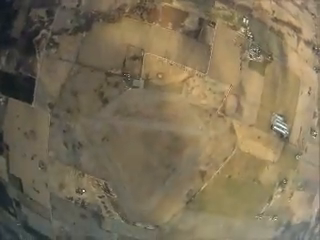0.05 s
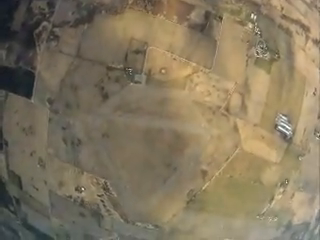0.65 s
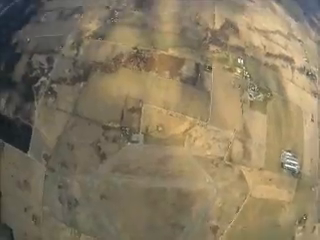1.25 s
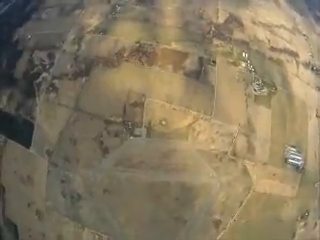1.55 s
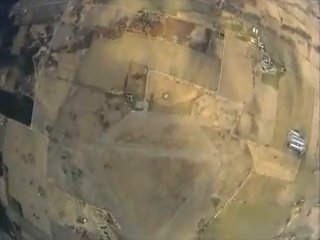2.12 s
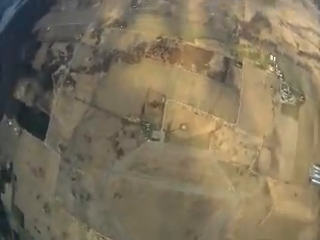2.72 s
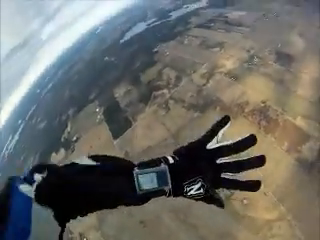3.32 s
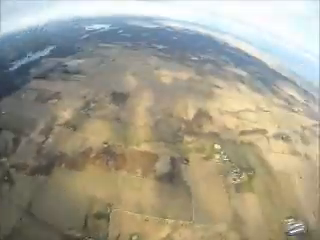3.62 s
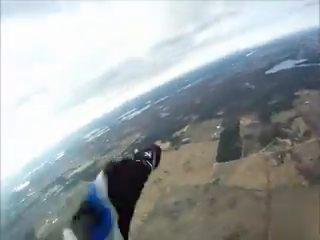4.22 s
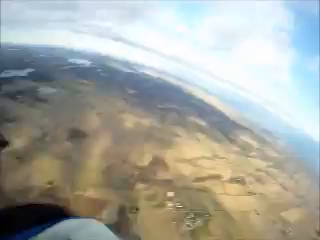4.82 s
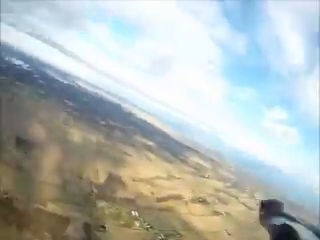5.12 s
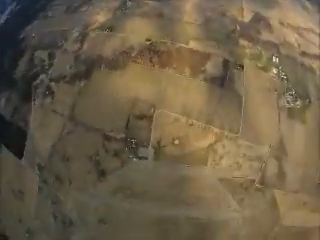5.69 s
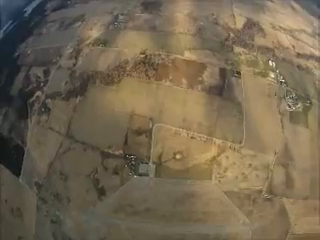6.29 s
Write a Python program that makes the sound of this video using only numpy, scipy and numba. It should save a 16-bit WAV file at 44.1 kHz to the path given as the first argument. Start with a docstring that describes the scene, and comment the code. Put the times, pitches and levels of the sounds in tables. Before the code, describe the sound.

Air tears over a helmet microphone high in the open sky, making a close, continuous roar with a slight howl and a thin hiss over rumbling thumps. As the falling skydiver turns, the wind grows choppy, with abrupt gusts and short dips. It becomes deeper and more muffled for a moment, fluttering over heavy buffeting, before brighter blasts of air come back.

```python
"""Rushing air tears past a helmet camera in freefall. Big swirls of air thump on its case, smaller ones
roar, howl and rasp, the finest hiss in spurts, and an edge of the case half whistles. As the body turns,
gusts slap on and off the microphone. When the head turns it into shelter, the rush breaks up into ragged
flutter over the thumping. A limiter (a fast automatic volume control) holds down the loud peaks."""
import sys
import numpy as np
from scipy import signal
from scipy.fft import rfft, irfft, next_fast_len
from scipy.io import wavfile
from scipy.ndimage import uniform_filter1d
from numba import njit

SR = 44100
rng = np.random.default_rng(int(sys.argv[2]) if len(sys.argv) > 2 else 0)


def master_out(mix):
    """Clip the mix to full scale and print it as 16-bit PCM to the path in sys.argv[1]."""
    frames = np.transpose(np.atleast_2d(mix))
    ceiling = np.clip(frames, -1, 1)
    pcm = np.round(ceiling * 32767).astype(np.int16)
    wavfile.write(sys.argv[1], SR, pcm)


N = 280035
TIME = np.arange(N) / SR


def gain(db):
    """Turn decibels into a number to multiply a sound by."""
    return 10 ** (np.asarray(db) / 20)


def steady(x, span_s):
    """Even out slow changes of level and keep the quick ones."""
    return x / np.sqrt(uniform_filter1d(x ** 2, size=int(span_s * SR)))


def curve(table):
    """Join (time_s, value) points with straight lines."""
    return np.interp(TIME, *np.transpose(table))


def colour(x, points):
    """Make some pitches louder and others softer, following (pitch_hz, level_db) points."""
    hz, db = np.transpose(points)
    size = next_fast_len(N)
    bins_hz = np.maximum(np.arange(size // 2 + 1) * SR / size, 1)
    level_db = np.interp(np.log(bins_hz), np.log(hz), db)
    return irfft(rfft(x, size) * gain(level_db), size)[:N]


def flutter(rate_hz):
    """A random wobble up to about the given rate, with a typical size of 1."""
    x = signal.sosfilt(signal.butter(2, rate_hz, fs=SR, output="sos"), rng.standard_normal(N))
    return x / x.std()


@njit
def resonate(x, hz, damping):
    """Ring at a moving pitch: output 0 keeps the sound below it, output 1 the sound around it."""
    out, band_state, low_state = np.empty((2, len(x))), 0., 0.
    for i in range(len(x)):
        step = np.tan(np.pi * hz[i] / SR)
        band = (band_state + step * (x[i] - low_state)) / (1 + step * (step + damping))
        out[0, i], out[1, i] = low_state + step * band, damping * band
        band_state, low_state = 2 * band - band_state, low_state + 2 * step * band
    return out


# Tone of the slow pressure swings from big swirls: pitch_hz, level_db
THUMP_TONE = [(12, 4.5), (25, -13), (42, -0.5), (70, 2), (115, 3.5), (160, 1.5), (215, -6.5), (280, -6),
              (400, -14.5), (900, -56)]
# How the thumping swells and fades: time_s, level_db
THUMP_LEVELS = [(0.0, -21.0), (0.23, -28.5), (1.18, -25.5), (1.29, -20), (1.8, -19), (2.49, -28.5),
                (4.17, -16), (4.27, -23.5), (4.66, -17.5), (5.34, -17.5), (5.42, -20.5), (5.88, -20.0),
                (6.12, -17), (6.34, -28)]


def thumping(shelter):
    """Big swirls of air thump on the case and grow deeper as it turns away from the wind."""
    swings = colour(rng.standard_normal(N), THUMP_TONE)
    biggest_swirls = colour(swings, [(85, 12), (170, 5.0)])
    depth = gain(-1.5 + 8.5 * np.minimum(shelter, 0.43))
    level_db = curve(THUMP_LEVELS) + 2 + 0.7 * shelter
    return gain(level_db) * steady(swings + (depth - 1) * biggest_swirls, span_s=0.09)


# The case's own note: pitch_hz, level_db
CASE_NOTE = [(200, -35), (450, -5), (590, -5), (750, -14.5), (1200, -11), (3000, -60)]
# Hollow tone that the case gives the roar: pitch_hz, level_db
HOLLOW_TONE = [(120, 5.5), (200, 5.5), (290, 0.5), (370, -0.5), (450, 1), (580, 1), (720, 0), (900, -4),
               (1400, -4)]


def roar(swirl_hz, shelter):
    """Swirls peel off around one wandering pitch and make the case ring."""
    hz = swirl_hz * np.exp(0.15 * flutter(20.7))
    swirls = resonate(rng.standard_normal(N), hz, damping=0.84)[1]
    swirls = resonate(swirls, hz * 1.85, damping=1.0)[0]  # smaller, higher swirls are much weaker
    swirls = steady(swirls, span_s=0.17)
    ring = steady(colour(rng.standard_normal(N), CASE_NOTE), span_s=0.11)
    return steady(colour(swirls + gain(-9 - 5 * shelter) * ring, HOLLOW_TONE), span_s=0.04)


def howl(swirl_hz):
    """In fast, smooth wind the swirls peel off almost regularly and hoot around one hollow note."""
    hz = swirl_hz * 1.038 * np.exp(0.078 * flutter(10.7))
    hoot = resonate(rng.standard_normal(N), hz, damping=0.24)[1]
    return steady(resonate(hoot, hz, damping=0.48)[1], span_s=0.103)


# Tone of the rasp, plus a thin fizz at the very top: pitch_hz, level_db
RASP_TONE = [(250, -7.5), (550, 7), (780, 3.5), (1050, -5.5), (1600, -10), (2800, -13), (4500, -37),
             (8000, -38), (10600, -23.5), (11500, -10)]


def rasp(swirls, shelter):
    """Strong swirls tear where their pressure changes fastest, so the rasp flutters in step with them."""
    pressure = colour(swirls, [(350, 7), (900, -23)])
    steepness = abs(steady(np.gradient(pressure), span_s=0.059))
    strength = np.minimum(steepness, 2.5) ** (0.34 + 0.87 * shelter)
    return steady(colour(rng.standard_normal(N) * strength, RASP_TONE), span_s=0.045)


# Tone that the case gives the hiss: pitch_hz, level_db
HISS_TONE = [(500, -9), (1000, -4), (1500, -4.5), (1850, -5), (2170, -1.5), (2800, -1), (3400, -7),
             (3700, -6), (4100, -11), (5200, -17.5), (7000, -19.5), (9500, -10), (10600, -20),
             (11500, -41.5)]


def hiss(shelter):
    """The finest swirls hiss in spurts, which get more ragged in shelter."""
    spurts_db = (0.5 + 5 * shelter) * np.clip(flutter(290), -3, 3)
    return steady(colour(rng.standard_normal(N) * gain(spurts_db), HISS_TONE), span_s=0.27)


def whistle(pitch_hz=2222.0):
    """An edge of the case half whistles when the wind meets it head on."""
    hz = pitch_hz * np.exp(0.038 * flutter(15))
    return steady(resonate(rng.standard_normal(N), hz, damping=0.21)[1], span_s=0.039)


# Wind slapping onto the microphone (+) or tearing off it (-) as the body turns; the rows at 2.974 s and 3.552 s
# are brief rushes of hiss as an arm sweeps past: start_s, length_s, roar_change_db, hiss_change_db,
# pitch_change_octaves
GUST_CHANGES = [(2.974, 0.067, -1, 3, 0.19), (3.058, 0.054, -1.5, 0.5, 0.46),
                (3.552, 0.056, -2.5, 2.5, 0.0), (3.903, 0.12, -4, -6, 0.055), (4.006, 0.038, 7, 2.5, 0.1),
                (4.104, 0.047, -7, -5, 0.15), (4.164, 0.13, 3.5, 5, 0.61), (4.457, 0.028, -11, -6, -0.16),
                (4.502, 0.035, -11, 0.5, -0.092), (4.716, 0.04, 4.5, 0, 0.27),
                (4.838, 0.136, 8.5, 3.5, -0.27), (5.241, 0.065, 5, 5.5, 0.35),
                (5.322, 0.059, 3.5, 5.5, 0.45), (5.486, 0.05, -4.5, 1.5, -0.23),
                (5.55, 0.043, 0.5, 1.5, 0.12), (5.658, 0.05, 5, 4.5, 0.22), (6.077, 0.02, 7.5, 4.5, 0.46)]


def gusts(rise_s=0.008, fall_s=0.011):
    """Each gust snaps on, holds and lets go; gives the changes in roar, hiss and roar pitch."""
    out = np.zeros((3, N))
    for start_s, length_s, *changes in GUST_CHANGES:
        rise = np.clip((TIME - start_s) / rise_s, 0, 1)
        fall = np.clip(1 - (TIME - start_s - length_s) / fall_s, 0, 1)
        out += np.outer(changes, rise * fall)
    return out


def treble_gap(x, pitch_hz=6024, width_hz=427):
    """One narrow band of the high pitches is missing."""
    offset = (np.arange(N // 2 + 1) * SR / N - pitch_hz) / width_hz
    return irfft(rfft(x) * (1 - np.exp(-offset ** 2)) ** 2, N)


# How squarely the wind meets the microphone, heard as the strength of the hiss: time_s, level_db
WIND_EXPOSURE = [(0.0, -23), (1.31, -23.0), (1.57, -18.5), (1.76, -23), (2.91, -24.5), (2.99, -19),
                 (3.34, -22.5), (3.57, -17.5), (3.64, -27), (4.06, -25.5), (4.09, -23), (4.35, -29),
                 (4.51, -47.5), (4.66, -47.5), (4.96, -33), (4.99, -45.0), (5.07, -52), (5.28, -28.5),
                 (5.48, -36), (5.63, -27.0), (5.69, -33.5), (6.05, -23.5), (6.14, -33.5), (6.34, -24.5)]
# How fast the roaring swirls peel off between gusts (smaller ones are quicker): time_s, pitch_hz
SWIRL_PITCHES = [(0.0, 365), (1.11, 424), (1.32, 338), (1.65, 387), (1.77, 327), (2.05, 400), (3.08, 385),
                 (3.88, 290), (4.27, 408), (4.48, 295), (4.65, 168), (4.88, 286), (5.07, 202), (5.33, 424),
                 (5.45, 222), (5.56, 370), (5.64, 250), (6.05, 328), (6.14, 255), (6.34, 353)]


def scene(head_on_db=-16.5, shelter_range_db=36.5, usual_swirl_hz=374):
    """Mix swirls of every size; shelter, swirl pitch and gusts set how loud each layer is."""
    exposure_db, swirl_hz = curve(WIND_EXPOSURE), curve(SWIRL_PITCHES)
    gust_roar_db, gust_hiss_db, gust_octaves = gusts()
    shelter = np.clip((head_on_db - exposure_db) / shelter_range_db, 0, 1)  # 0 facing the wind, 1 hidden
    lift_off = np.clip((shelter - 0.76) / (1 - 0.76), 0, 1)  # in deep shelter the wind leaves the case
    octaves = np.log2(swirl_hz / usual_swirl_hz)  # quicker swirls are louder
    flap_db = 1.5 * shelter * flutter(21.6)  # the wind flaps at random, more so in shelter

    roar_db = -15 + 3 * octaves - 2.5 * shelter - 13 * lift_off + gust_roar_db
    howl_db = -19 + 17 * octaves - 19.5 * shelter
    rasp_db = -22 + 6.5 * octaves - 4 * shelter - 11 * lift_off + 0.84 * gust_roar_db + flap_db
    hiss_db = exposure_db + 1.5 + gust_hiss_db + flap_db
    whistle_db = hiss_db - 0.5 - 31.5 * shelter  # fades fastest in shelter

    swirls = thumping(shelter)
    swirls += gain(roar_db) * roar(swirl_hz * 2 ** gust_octaves, shelter)
    swirls += gain(howl_db) * howl(swirl_hz)
    rush = swirls + gain(rasp_db) * rasp(swirls, shelter)
    rush += gain(hiss_db) * hiss(shelter)
    rush += gain(whistle_db) * whistle()
    return treble_gap(rush)[None]


@njit
def follow_peaks(x, attack_s, release_s):
    """A level that jumps up with each peak and sinks back slowly."""
    out, level = np.empty(len(x)), 0.
    for i in range(len(x)):
        size = abs(x[i])
        response_s = attack_s if size > level else release_s
        level += (size - level) * (1 - np.exp(-1 / (SR * response_s)))
        out[i] = level
    return out


def limiter(x, ceiling_db=-6.5, attack_s=0.00043, release_s=0.051):
    """Each peak above the ceiling turns the volume down at once; it soon comes back up."""
    peaks = np.roll(follow_peaks(x, attack_s, release_s), -int(attack_s * SR))  # looks slightly ahead
    return x / np.maximum(1, peaks / gain(ceiling_db))


def record(dry, top_hz=11650):
    """The camera holds down the loud peaks and cuts off the highest pitches."""
    lowpass = signal.ellip(14, .2, 75, top_hz, fs=SR, output="sos")
    return signal.sosfilt(lowpass, limiter(dry[0]))[None]


dry = scene()
out = record(dry)
master_out(out)
```